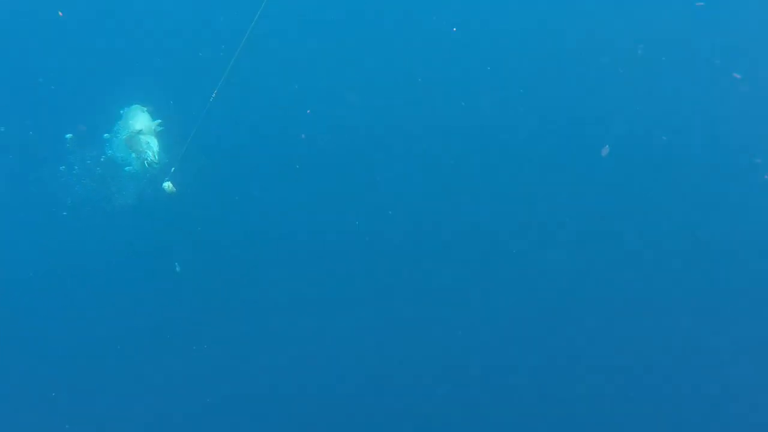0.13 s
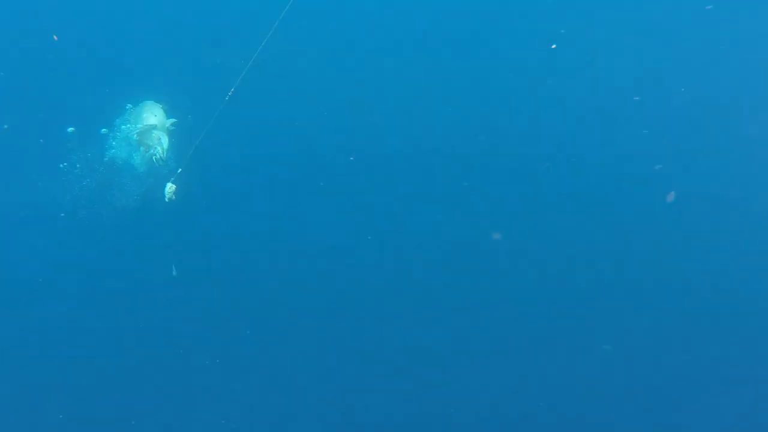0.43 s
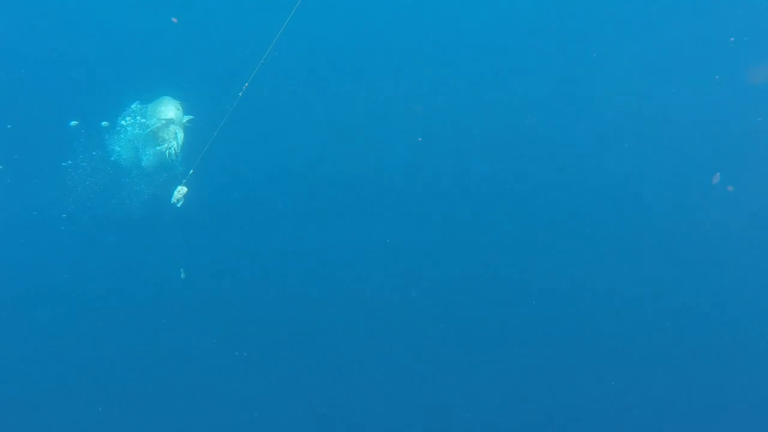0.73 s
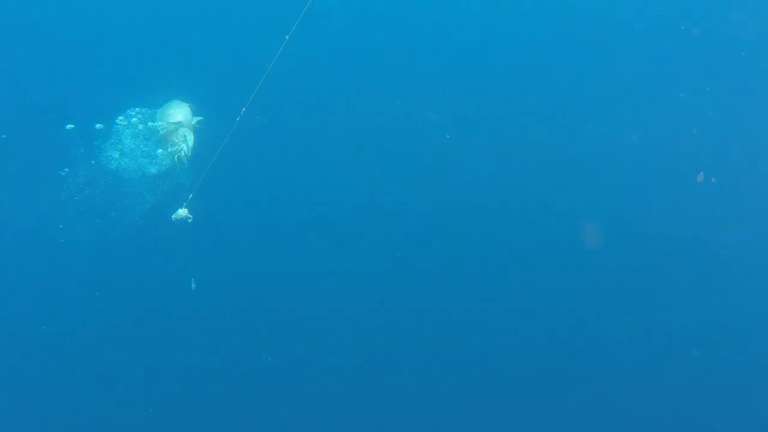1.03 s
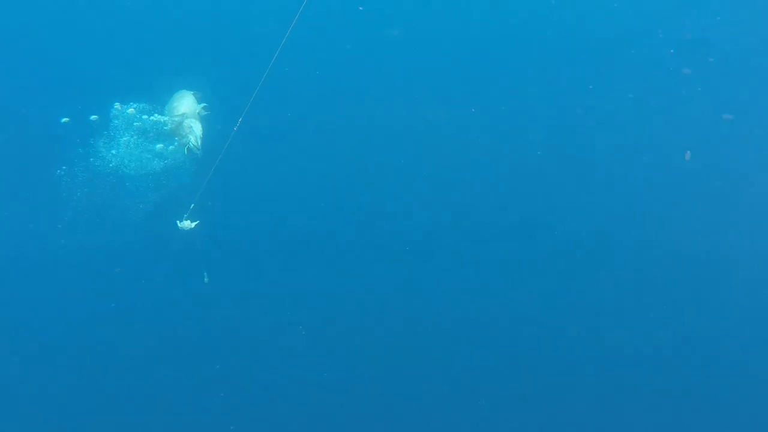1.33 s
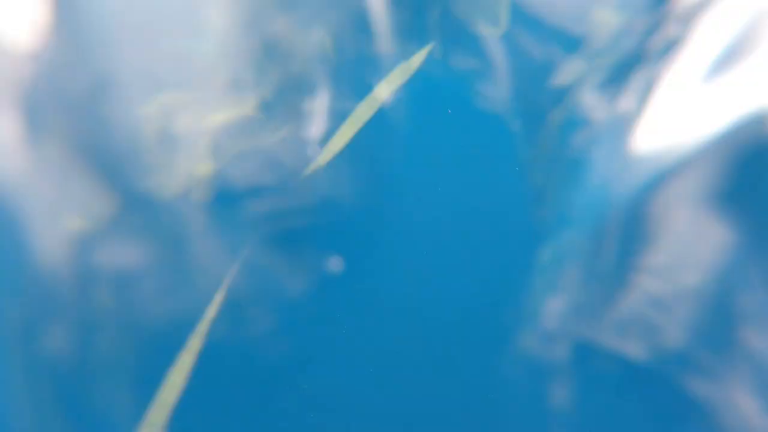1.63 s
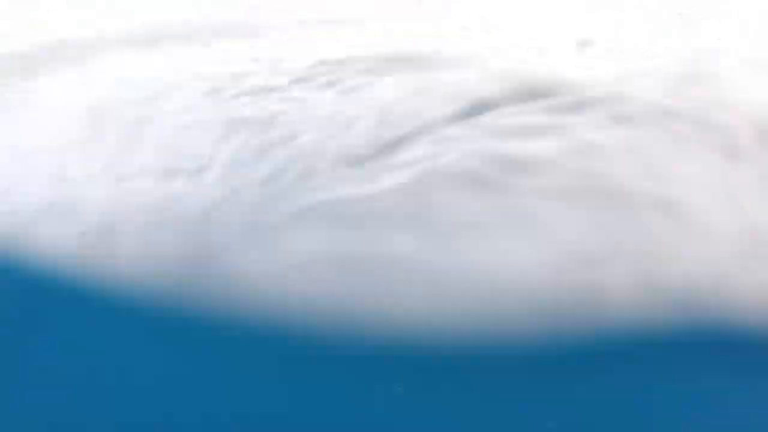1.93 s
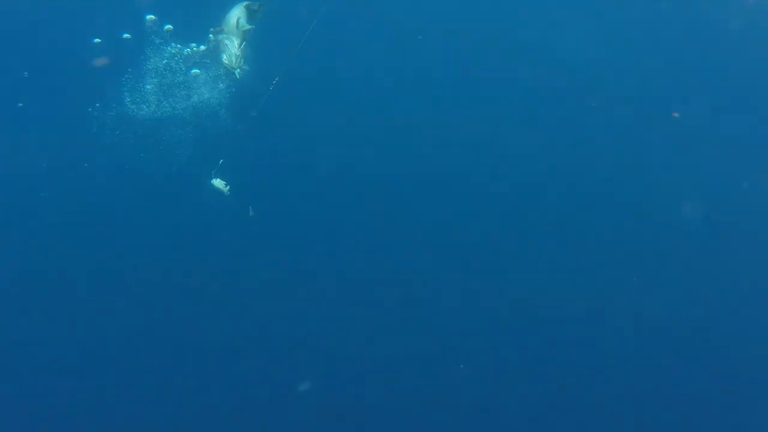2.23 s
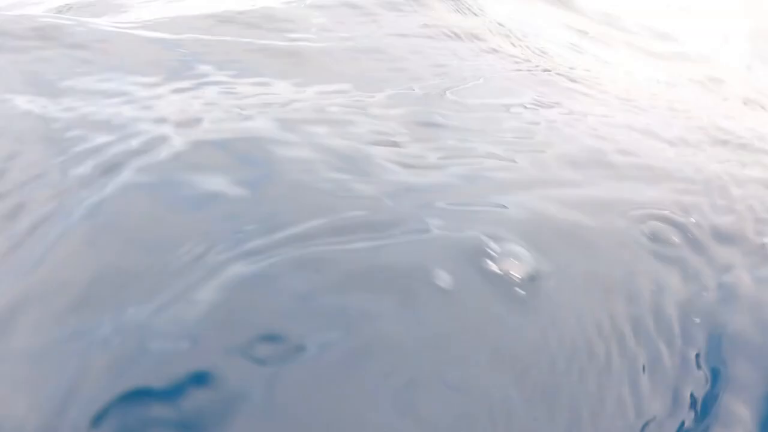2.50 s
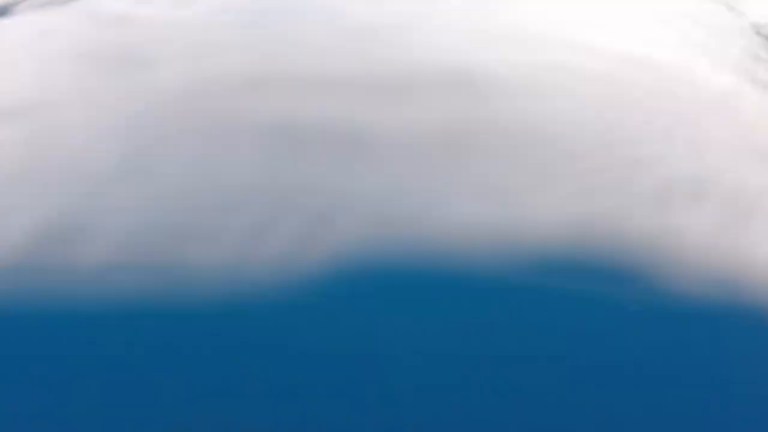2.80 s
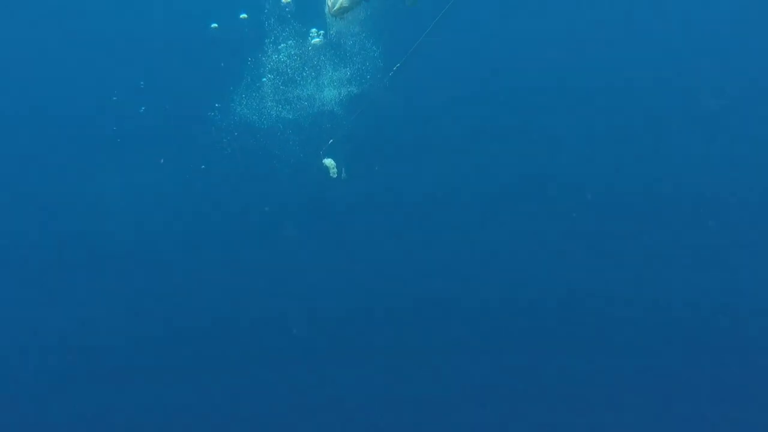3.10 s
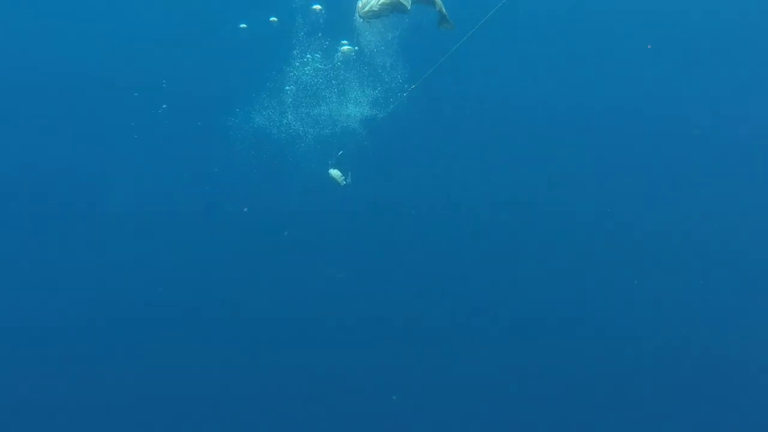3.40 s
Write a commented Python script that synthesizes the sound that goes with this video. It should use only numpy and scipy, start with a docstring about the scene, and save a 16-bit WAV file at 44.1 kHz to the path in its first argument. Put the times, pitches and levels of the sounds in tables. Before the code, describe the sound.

Water gurgles and bubbles against a sealed camera housing over an idling boat's low drone; it surfaces with thin fizz and drips, splashes, then plunges into near-quiet. Close, muffled microphone inside the housing.

```python
"""Camera housing beside an idling boat

A camera in a sealed housing is hauled up beside an idling boat, bobs at the surface and drops under again.
The engine drones as an unsteady tone; filtered noise and ringing grains make the flow's rumble and gurgle.
Fine fizz is the air while the housing is out; noise bands on moving pitches sing, drain and squeal.
Dying sines make the pinging bubbles, short bright rings the droplets; two bursts of dense grains with a
whistling edge are the splashes that close over it, next to a slap of water, a spray and faint squeaks."""
import sys
import numpy as np
from scipy import signal
from scipy.fft import rfft, irfft
from scipy.io import wavfile
from scipy.ndimage import uniform_filter1d

SR = 44100
rng = np.random.default_rng(int(sys.argv[2]) if len(sys.argv) > 2 else 0)


def boost_factor(decibels):
    """Convert a level in decibels to a linear amplitude factor."""
    exponent = np.asarray(decibels, float) / 20
    return 10 ** exponent


def store_wav(level_fs):
    """Save 16-bit WAV to argv[1]."""
    pcm = np.round(np.clip(np.atleast_2d(level_fs), -1, 1) * 32767)
    wavfile.write(sys.argv[1], SR, pcm.T.astype(np.int16))


N = 156555  # length in samples


def rms_one(x):
    """Scale to rms 1."""
    return x / np.sqrt(np.mean(x ** 2) + 1e-20)


def in_time(rows):
    """Columns joined in time; last, a window that fades over 30 ms to silence outside the table."""
    s, *columns = np.transpose(rows)
    t = np.arange(N) / SR
    fade_in = np.clip((t - s[0]) / .03 + 1, 0, 1)
    fade_out = np.clip((s[-1] - t) / .03 + 1, 0, 1)
    return [np.interp(t, s, c) for c in columns] + [fade_in * fade_out]


def drift(rate_hz):
    """Slow random wander of spread about 1: noise through two equal low-pass poles at rate_hz."""
    r = np.exp(-80 * np.pi * rate_hz / SR)  # runs at one value per 40 samples
    slow = signal.lfilter([1], [1, -2 * r, r * r], rng.standard_normal(N // 40 + 2002))
    slow = rms_one(slow[2000:])  # the filter has settled
    return uniform_filter1d(np.interp(np.arange(N) / 40, np.arange(len(slow)), slow), size=40)


def colour(x, points):
    """Give a flat sound the spectrum of the points; rms 1."""
    hz, db = np.transpose(points)
    f = np.maximum(np.arange(N // 2 + 1) * SR / N, 1)
    gain = boost_factor(np.interp(np.log(f), np.log(hz), db))
    return rms_one(irfft(rfft(x) * gain, N))


def grains(per_s, cycles, spread_db, low_hz, high_hz):
    """Random clicks dealt to 24 resonators that fall 60 dB in the given cycles; about flat on average."""
    sizes = boost_factor(spread_db * np.minimum(rng.exponential(1, N), 5)) * rng.choice([-1, 1], N)
    clicks = sizes * (rng.random(N) < per_s / SR)
    dealt = rng.integers(0, 24, N)
    out = np.zeros(N)
    for k, hz in enumerate(np.geomspace(low_hz, high_hz, 24)):
        r, w = boost_factor(-60 * hz / (cycles * SR)), 2 * np.pi * hz / SR
        mine = clicks * (dealt == k) + 1e-18
        out += hz * signal.lfilter([1, 0, -1], [1, -2 * r * np.cos(w), r * r], mine)
    return out


def add(out, s, piece):
    """Mix a piece in at s seconds."""
    i = int(s * SR)
    out[i:i + len(piece)] += piece[:N - i]


def loose_tone(turn, width_hz):
    """Narrow noise around a moving pitch: two wandering levels on a cosine and a sine."""
    return drift(width_hz) * np.cos(turn) + drift(width_hz) * np.sin(turn)


def wavering(hz, db, width_hz):
    """A tone, part steady, part narrow noise around it; also its phase."""
    turn = 2 * np.pi * np.cumsum(hz) / SR
    steady = 0.52  # share of the power
    tone = np.sqrt(2 * steady) * np.sin(turn) + np.sqrt(1 - steady) * loose_tone(turn, width_hz)
    return boost_factor(db) * tone, turn


def singing_band(rows, width_hz):
    """Narrow noise that follows the pitch and level of a table."""
    hz, db, window = in_time(rows)
    turn = 2 * np.pi * np.cumsum(hz) / SR
    return window * boost_factor(db) * loose_tone(turn, width_hz)


# faint even treble hiss: t/s, level/dB
SHEEN = [(.2, -100), (.6, -90.5), (1.7, -83), (2.9, -84)]


def sheen():
    """Smooth noise in a band from 5.5 to 9.5 kHz."""
    db, window = in_time(SHEEN)
    band = signal.butter(3, [5500, 9500], "band", fs=SR, output="sos")
    return window * boost_factor(db) * rms_one(signal.sosfilt(band, rng.standard_normal(N)))


# engine drone at the firing rate: t/s, f/Hz, level/dB
DRONE = [(0, 68.6, -32), (.07, 73.95, -37.5), (.17, 74.06, -32), (.81, 71.77, -40), (1.27, 72.91, -28),
         (1.95, 73.48, -25), (2.82, 72.96, -30), (2.93, 69.5, -33.5), (3.0, 75.1, -58.5), (3.12, 74.4, -39),
         (3.25, 71.1, -52), (3.55, 70.66, -56)]
# second hum while the housing is out of the water: t/s, f/Hz, level/dB
HUM = [(2.04, 125.5, -57), (2.11, 129.9, -27), (2.27, 124.2, -44.5), (2.52, 129, -29.5),
       (2.72, 126.2, -42.5)]


def engine():
    """Unsteady drone and hum; also a throb at half the firing rate."""
    hz, db, _ = in_time(DRONE)
    drone, turn = wavering(hz, db, 4.6)
    hz, db, window = in_time(HUM)
    hum, _ = wavering(hz, db, 1.0)
    return drone + window * hum, np.sin(turn / 2)


# flow on the housing: t/s, deep level/dB, low level/dB
FLOW = [(0.0, -42.5, -36.5), (0.27, -32.5, -38.5), (0.33, -37.5, -40.5), (1.38, -29, -29),
        (2.78, -38, -30.5), (2.92, -23, -25), (3.03, -60, -53.5), (3.55, -52.5, -61)]
# relative spectrum of the deep rumble: f/Hz, level/dB
DEEP_COLOUR = [(8.8, -39), (15, -2), (43, 0.5), (62, -5), (81, -35), (140, -120)]
# relative spectrum of the large bubbles: f/Hz, level/dB
LOW_COLOUR = [(50, -34.5), (85, 1.5), (137, -2), (205, -11.5), (292, -19.5), (400, -25.5), (580, -31.5),
              (990, -120)]


def flow():
    """Deep rumble of noise; above it large sluggish bubbles as slow-ringing grains."""
    deep_db, low_db, _ = in_time(FLOW)
    deep = colour(rng.standard_normal(N), DEEP_COLOUR)
    low = colour(grains(260, 15, 2.5, 83.3, 507), LOW_COLOUR)
    return boost_factor(deep_db) * deep + boost_factor(low_db + 1.7 * drift(36)) * low


# gurgle of small bubbles along the housing: t/s, level/dB
GURGLE = [(0, -53), (.05, -45.5), (.18, -40.5), (.36, -33.5), (.5, -33), (.74, -34), (1.18, -33),
          (1.3, -33), (1.37, -39.5), (1.45, -37.5), (1.6, -51), (1.8, -53), (2.25, -55), (2.3, -64.5),
          (2.8, -49.5), (2.96, -63.5), (3.01, -85), (3.14, -75.5), (3.22, -66.5), (3.55, -64)]
# its relative spectrum: f/Hz, level/dB
GURGLE_COLOUR = [(180, -42.5), (300, -12.5), (464, -9), (665, -5), (740, 1), (900, -2), (1060, -2.5),
                 (1220, -4.5), (1460, -25.5), (2010, -29.5), (2400, -45), (3050, -48.5), (3600, -53),
                 (5000, -68), (7500, -64), (11000, -72.5), (14000, -99.5)]


def gurgle(throb):
    """Dense small bubbles heard through the housing, clumped at random and shaken by the engine."""
    db, _ = in_time(GURGLE)
    clump_db, throb_db = 1.5, 0.5
    lump = clump_db * drift(20) + throb_db * throb
    small = grains(2600, 10, 2, 303, 11000)
    return boost_factor(db) * colour(boost_factor(lump) * small, GURGLE_COLOUR)


# air space of the housing, singing faintly: t/s, f/Hz, level/dB
CAVITY = [(0, 766.7, -62), (.4, 747.6, -55), (1.3, 772.5, -43.5), (1.6, 767, -58), (1.78, 770.7, -49),
          (1.85, 760, -69.5), (2.93, 735, -69.5), (2.97, 732, -49.5), (3.02, 722, -66.5),
          (3.2, 699.6, -60.5), (3.55, 650, -66)]


def cavity():
    """The enclosed air resonates as a noise band on a moving pitch."""
    return singing_band(CAVITY, 51)


# hiss of the open air and draining water, before a 4.5 dB lift: t/s, level/dB
AIR = [(1.55, -60), (1.72, -61), (1.84, -55.5), (1.9, -53.5), (2.05, -54.5), (2.23, -63), (2.33, -60.5),
       (2.42, -60.5), (2.6, -61.5), (2.7, -55.5), (2.8, -54.5)]
# its relative spectrum: f/Hz, level/dB
AIR_COLOUR = [(210, -32), (350, -15.5), (672, -4), (800, -19), (1210, -6.5), (1500, -7.5), (2050, -14.5),
              (2700, -24.5), (3600, -35), (4800, -40), (7500, -50), (11000, -67)]


def air():
    """Fine fizz while the housing is out; a film of water dulls it until the port drains."""
    db, window = in_time(AIR)
    clears_s, clearing_s, film_cut_hz, film_leak_db = 1.726, 0.22, 1700, -9
    fizz = colour(grains(12000, 5.7, 1.0, 310, 12000), AIR_COLOUR)
    film = signal.butter(4, film_cut_hz, fs=SR, output="sos")
    dull = signal.sosfiltfilt(film, fizz)
    drained = np.clip((np.arange(N) / SR - clears_s) / clearing_s, 0, 1) ** 2
    treble = (drained + boost_factor(film_leak_db)) * (fizz - dull)
    return window * boost_factor(db + 4.5 + 3.6 * drift(9.8)) * (dull + treble)


# water draining off the port: t/s, f/Hz, level/dB
WASH = [(1.62, 1350, -70), (1.71, 1550, -51.5), (1.8, 1500, -63), (1.87, 1900, -54), (2.0, 1750, -55),
        (2.22, 2000, -49.5), (2.26, 1900, -57.5)]


def wash():
    """Draining water rings in a broad band that mostly climbs."""
    return singing_band(WASH, 130)


# squeal of the last water: t/s, f/Hz, level/dB
SQUEAL = [(2.52, 4280, -81), (2.6, 3670, -70.5), (2.7, 3650, -87)]


def squeal():
    """The last water drains with a diffuse squeal, a noise band on a moving pitch."""
    return singing_band(SQUEAL, 90)


# faint squeaks of the line and one low glug: t/s, level/dB, start f/Hz, end f/Hz, length/s
SQUEAKS = [(0.143, -79, 3170, 2980, 0.09), (0.439, -76.5, 3250, 3050, .11), (0.61, -79, 2950, 3080, 0.074),
           (0.751, -70.5, 3060, 3170, 0.07), (2.38, -33, 122, 297, .11)]


def squeaks():
    """Sine glides with rounded ends and a slightly unsteady level."""
    out = np.zeros(N)
    for s, db, start_hz, end_hz, length in SQUEAKS:
        hz = np.linspace(start_hz, end_hz, int(length * SR))
        swell = np.hanning(len(hz)) ** .5
        add(out, s, boost_factor(db) * swell * np.sin(2 * np.pi * np.cumsum(hz) / SR))
    return out * (1 + .3 * drift(40))


# droplets: t/s, peak level/dB, f/Hz
TICKS = [(1.0555, -60, 3870), (1.3285, -47.5, 6470), (1.3682, -53, 7200), (1.3978, -49.5, 3530),
         (1.9501, -67, 3710), (1.9842, -32.5, 4070), (1.9882, -38.5, 4110), (2.2657, -53, 5900),
         (2.2685, -41.5, 5800), (2.2724, -47.5, 4700), (2.4892, -60, 3640), (2.7212, -51.5, 3820),
         (2.7468, -48.5, 3700), (2.7862, -62, 3940), (2.7955, -49, 5060), (2.8055, -45, 6200),
         (2.8155, -34.5, 7000), (2.8284, -44, 7500), (2.8342, -36, 5800), (2.852, -40.5, 3430),
         (2.876, -44, 4700), (2.8958, -51, 4230), (2.909, -54.5, 7000), (2.9209, -38.5, 3830),
         (2.9306, -36, 3600), (2.9414, -45.5, 5050)]


def ticks():
    """Droplets tick as short bright rings with a pinch of noise, falling 20 dB in 9.9 cycles."""
    out, t = np.zeros(N), np.arange(SR // 100) / SR
    noise = np.diff(rng.standard_normal((len(TICKS), len(t) + 2)), axis=1)[:, 1:]
    noise = noise * np.minimum(t * 2500, 1)  # fades in over 0.4 ms
    for (s, db, hz), pinch in zip(TICKS, noise):
        ring = np.sin(2 * np.pi * hz * t)
        add(out, s, boost_factor(db - 20 * t * hz / 9.9) * (ring + 0.6 * pinch))
    return signal.sosfilt(signal.butter(5, 8200, fs=SR, output="sos"), out)


# single bubbles: t/s, peak level/dB, f/Hz, least t60/s, least swell/s
BUBBLES = [(.183, -20.5, 883, 0.0092, .001), (0.214, -26, 960, 0.016, .001),
           (.288, -26.5, 777, 0.041, .001), (.496, -25, 936, 0.074, .001),
           (0.521, -23.5, 121.5, 0.15, 0.012), (.701, -22, 781, 0.028, .001), (.784, -24, 732, 0.062, .001),
           (0.909, -28.5, 158.3, 0.62, 0.05), (.948, -24, 910, 0.069, .001), (1.032, -17, 758, 0.017, .001),
           (1.054, -24, 261, 0.078, .002), (1.18, -22.5, 945, 0.057, 0.00072),
           (1.309, -20, 628, 0.029, 0.011), (1.329, -20, 1284, 0.036, 0.0011),
           (1.338, -20.5, 780, 0.064, 0.0013), (1.396, -18, 944, 0.01, 0.00063),
           (1.434, -26, 1112, 0.11, 0.0015), (1.997, -30.5, 1015, 0.022, 0.00083),
           (2.073, -17, 159, 0.062, 0.0089), (2.091, -28.5, 934, 0.028, 0.0088),
           (2.089, -29.5, 1956, 0.023, 0.018), (2.251, -36, 1050, 0.029, 0.0018),
           (2.262, -19.5, 1003, .02, 0.0012), (2.259, -22, 282, 0.079, 0.0077),
           (2.708, -31, 668, 0.024, 0.0023), (2.79, -40.5, 3200, 0.021, .001),
           (2.796, -39.5, 4950, 0.0051, 0.00085), (2.81, -28.5, 1894, 0.015, .001),
           (2.815, -28, 5300, 0.0085, .001), (2.853, -22, 1337, 0.0081, .001),
           (2.878, -23.5, 257, 0.176, 0.004), (2.896, -13, 350, 0.021, 0.0032),
           (2.899, -26, 580, 0.051, .001), (2.9, -45, 3670, 0.011, 0.0009),
           (2.91, -18.5, 894, 0.073, 0.0017), (2.92, -27, 1730, 0.012, .001),
           (2.921, -21.5, 831, 0.041, .001), (2.93, -15, 813, 0.046, .001),
           (2.941, -16.5, 728.6, 0.055, .001), (2.955, -26.5, 516, 0.07, 0.0024),
           (3.041, -48, 708, 0.051, .001), (3.042, -56.5, 1400, 0.022, .001),
           (3.043, -29.5, 110.2, 0.45, 0.022), (3.067, -47, 580, 0.065, .002),
           (3.15, -33, 834, 0.098, 0.0054)]


def bubbles():
    """Each swells, then rings as a dying, roughened sine that rises in pitch."""
    rise_per_s, rough = 0.34, 0.19
    out, t = np.zeros(N), np.arange(SR // 3) / SR
    for s, db, hz, t60, swell_s in BUBBLES:
        t60, swell_s = max(t60, .003), max(swell_s, 0.81 / hz)
        swell = np.sin(np.minimum(t / swell_s, 1) * np.pi / 2) ** 2
        decay = boost_factor(db - 60 * np.maximum(t - swell_s, 0) / t60)
        ring = np.sin(2 * np.pi * hz * (t + rise_per_s * t * t / 2))
        add(out, s, decay * swell * ring)
    return out * (1 + rough * drift(220))


def splash(rows, spectrum):
    """Dense spurting grains, low-passed at a moving top pitch; the closing gap whistles just below it."""
    db, top_hz, gap_db, window = in_time(rows)
    burst = colour(grains(7000, 6, 3.0, 200, 12000), spectrum)
    white, out = rng.standard_normal(N), np.zeros(N)
    first, last = int(rows[0][0] * SR) - 2048, int(rows[-1][0] * SR) + 2048
    for i in range(first, last, 128):
        cut = signal.butter(8, top_hz[i], fs=SR, output="sos")
        gap = signal.butter(2, [.86 * top_hz[i], 0.98 * top_hz[i]], "band", fs=SR, output="sos")
        run = slice(i - 640, i + 128)  # 640 samples of run-up settle the filters
        whistle = boost_factor(gap_db[i] + 12) * signal.sosfilt(gap, white[run])
        out[i:i + 128] = (signal.sosfilt(cut, burst[run]) + whistle)[-128:]
    spurt_db, spurt_hz = 5.5, 70
    return out * boost_factor(db + spurt_db * drift(spurt_hz)) * window


# In the four splash tables the whistle level is relative to the splash, before a 12 dB lift.
# drops on the housing: t/s, level/dB, top f/Hz, whistle level/dB
SPRAY = [(2.411, -81, 8230, -18), (2.417, -43, 7500, -17), (2.43, -53, 6830, -23), (2.445, -69, 6400, -15)]
# its relative spectrum: f/Hz, level/dB
SPRAY_COLOUR = [(1000, 1), (3000, -1.5), (4800, -17), (7000, -5), (10000, -11)]


def spray():
    """A few drops spray on the housing, as a brief bright splash."""
    return splash(SPRAY, SPRAY_COLOUR)


# water against the housing: t/s, level/dB, top f/Hz, whistle level/dB
SLAP = [(1.297, -80.5, 2990, -11), (1.305, -34.5, 2900, -18), (1.332, -29.5, 3010, -30.5),
        (1.36, -42, 2910, -18.5), (1.372, -51, 2850, -13.5)]
# its relative spectrum: f/Hz, level/dB
SLAP_COLOUR = [(120, -18), (250, 12.5), (600, 5), (1300, -22), (1900, -10), (2250, -44), (2700, -27),
               (3200, -38)]


def slap():
    """Water slaps the housing before it surfaces, as a short dull splash."""
    return splash(SLAP, SLAP_COLOUR)


# first splash: t/s, level/dB, top f/Hz, whistle level/dB
DIP = [(2.238, -43.5, 2010, -27), (2.25, -28, 2610, -30), (2.27, -21, 3010, -46),
       (2.282, -66.5, 2974, -31.5)]
# its relative spectrum: f/Hz, level/dB
DIP_COLOUR = [(120, -34.5), (220, 0.5), (515, 10), (890, -8), (1720, -10), (2400, -24.5), (4000, -47.5)]


def dip():
    """Water closes over the bobbing housing for a moment."""
    return splash(DIP, DIP_COLOUR)


# last splash: t/s, level/dB, top f/Hz, whistle level/dB
PLUNGE = [(2.784, -73, 8000, -15), (2.797, -41.5, 7480, -25), (2.818, -36.5, 7290, -23.5),
          (2.828, -45.5, 5810, -12.5), (2.853, -42, 5460, -11), (2.862, -33.5, 4800, -12.5),
          (2.905, -30, 4560, -24.5), (2.915, -32.5, 3000, -26), (2.94, -28.5, 2600, -22),
          (2.955, -57, 2008, -24)]
# its relative spectrum: f/Hz, level/dB
PLUNGE_COLOUR = [(120, -39.5), (250, 8), (500, -7), (900, -14.5), (1500, -14.5), (2500, -19), (4000, -23.5),
                 (5500, -29), (8000, -26.5)]


def plunge():
    """The housing drops under; the splash dulls as water closes in."""
    return splash(PLUNGE, PLUNGE_COLOUR)


def scene():
    """All sources at one microphone."""
    drone, throb = engine()
    background = sheen() + drone + flow() + gurgle(throb) + cavity()
    surface = air() + wash() + squeal() + squeaks() + ticks() + bubbles()
    splashes = spray() + slap() + dip() + plunge()
    return (background + surface + splashes)[None]


def top_cut(x):
    """Nothing passes above the cut-off."""
    return signal.sosfilt(signal.butter(12, 15000, fs=SR, output="sos"), x)


def record(dry):
    """The microphone rounds off peaks softly and adds faint self-noise."""
    soft = 0.31 * np.tanh(dry / 0.32)
    hiss = boost_factor(-96) * rng.standard_normal(dry.shape)
    return top_cut(soft + hiss)


dry = scene()
out = record(dry)
store_wav(out)
```